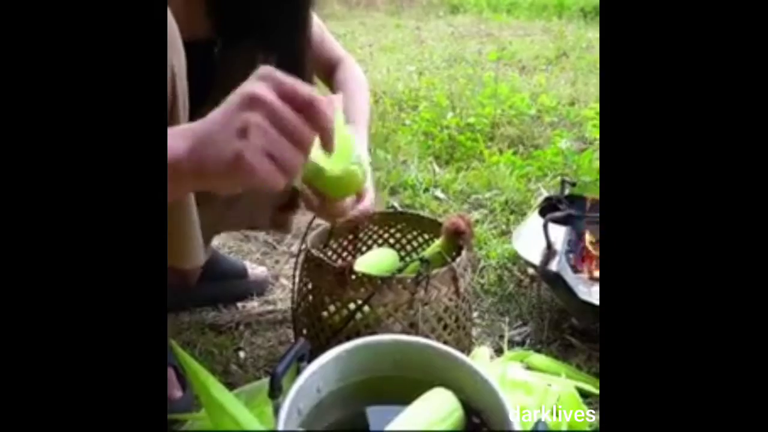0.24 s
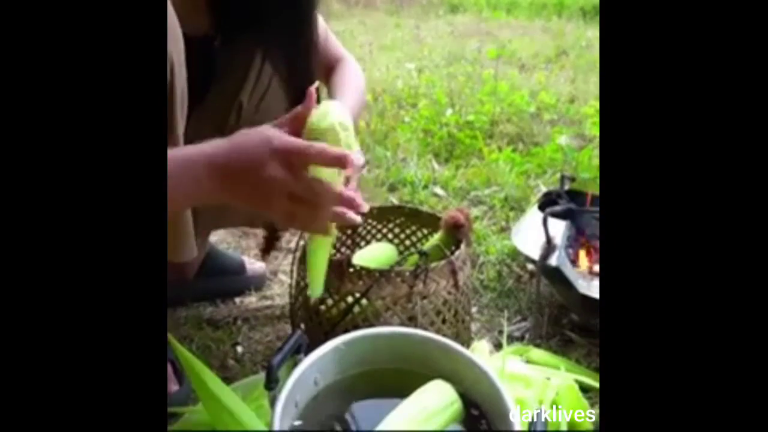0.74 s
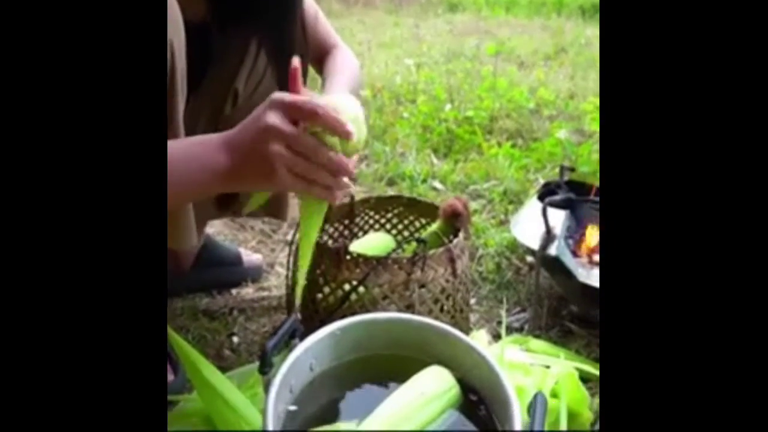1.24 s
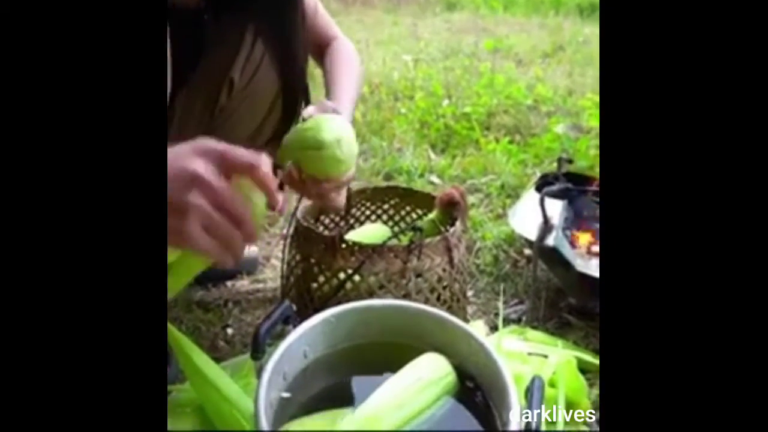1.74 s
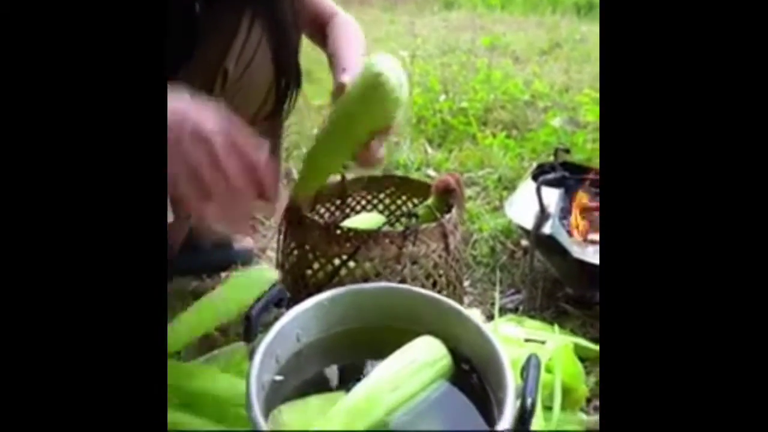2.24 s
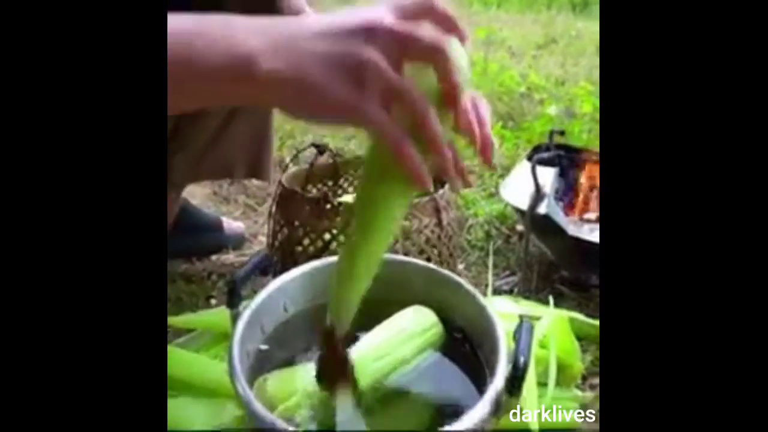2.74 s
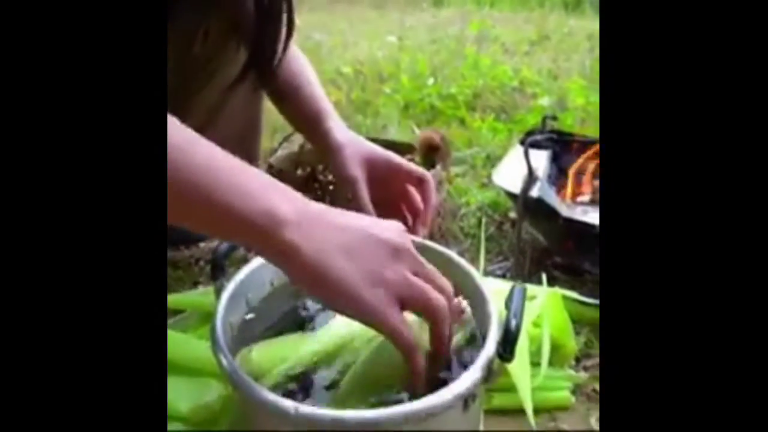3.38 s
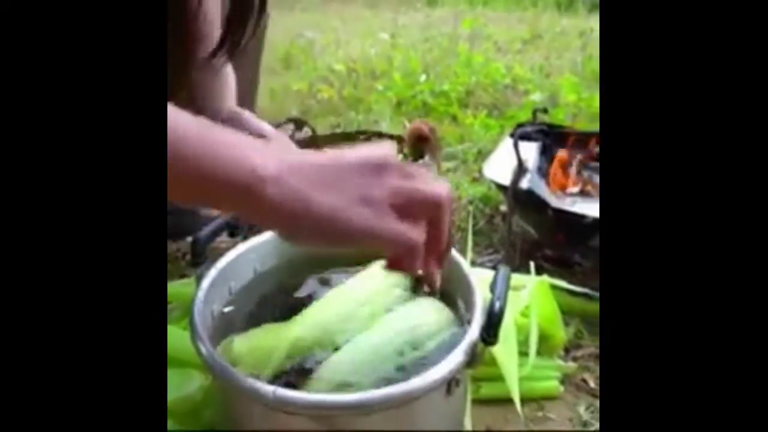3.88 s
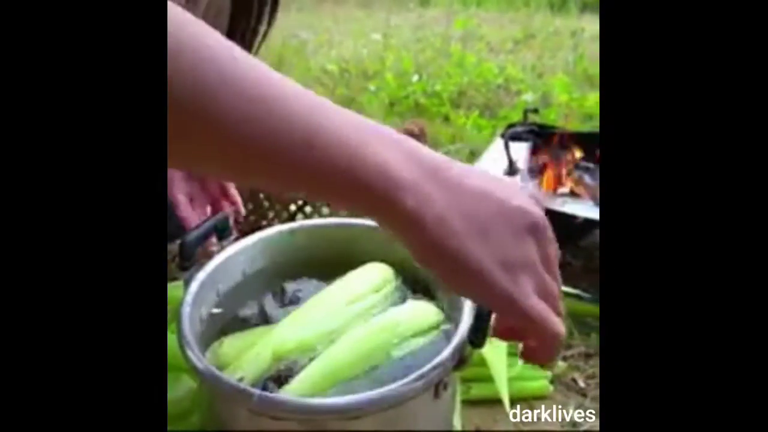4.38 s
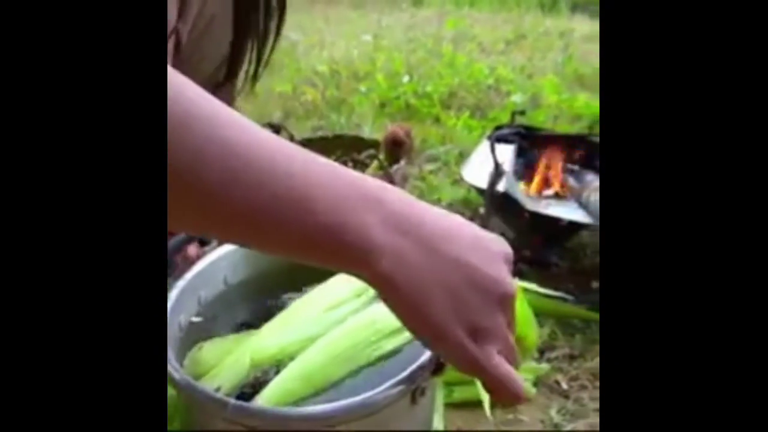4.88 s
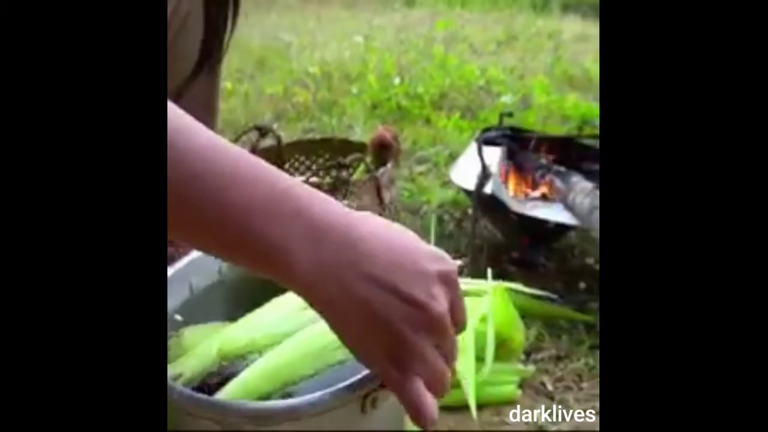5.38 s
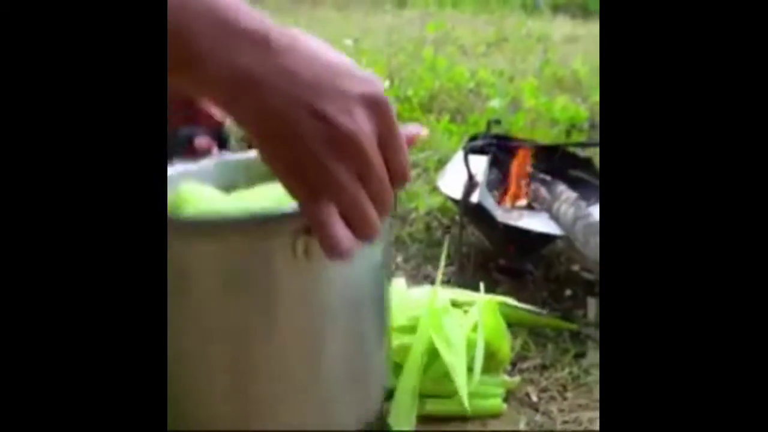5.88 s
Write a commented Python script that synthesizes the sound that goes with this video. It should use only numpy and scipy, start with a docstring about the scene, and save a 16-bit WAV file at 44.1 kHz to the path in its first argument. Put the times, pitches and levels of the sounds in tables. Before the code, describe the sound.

Fresh corn husk rips away with loud crisp cracks, leaves rustle, then a metal pot clicks and briefly rings over a faint low engine throb.

```python
"""A far engine throbs under faint outdoor hiss: dull periodic thuds and coloured noise.
Close by, green husks are ripped from an ear of corn: runs of tiny ringing breaks with loud cracking snaps.
Leaves rustle in strokes of friction noise, soft swells of narrow hiss pass, and soft knocks are dull puffs.
Then the ear goes into a metal pot: it and its handles click and ring through decaying sines,
beside thin bright ticks, likely a small fire."""
import sys
import numpy as np
from scipy import signal
from scipy.fft import rfft, irfft, next_fast_len
from scipy.io import wavfile
from scipy.ndimage import uniform_filter1d

SR = 44100
rng = np.random.default_rng(int(sys.argv[2]) if len(sys.argv) > 2 else 0)


def dump_mix(stems):
    """Bounce the given channels to the path in sys.argv[1] as a 16-bit WAV at rate SR."""
    frames = np.atleast_2d(stems).T  # one column per channel
    limited = np.clip(frames, -1, 1)  # hard clip at full scale
    pcm = np.round(limited * 32767).astype(np.int16)
    wavfile.write(sys.argv[1], SR, pcm)


N = 269715
TIME = np.arange(N) / SR
PADDED = next_fast_len(N, real=True)
HZ = np.fft.rfftfreq(PADDED, 1 / SR)
TAPS = 4096  # samples in the working buffer of a short sound


def amp(db):
    """Turns decibels into a linear gain."""
    return 10 ** (np.asarray(db) / 20)


def unit(x):
    """Scales to rms 1."""
    return x / np.sqrt(np.mean(x ** 2) + 1e-20)


def read(points, hz):
    """Reads a curve joined by straight lines over log frequency."""
    f, value = np.transpose(points)
    return np.interp(np.log(hz + 1), np.log(f + 1), value)


def add(mix, s, sound):
    """Lays a stereo sound into the mix at s seconds."""
    part = mix[:, round(s * SR):][:, :sound.shape[1]]
    part += sound[:, :part.shape[1]]


def shape(x, gain):
    """Filters a whole-length signal by a gain over frequency."""
    return irfft(rfft(x, PADDED) * gain, PADDED)[..., :N]


def tint(x, colour):
    """Gives a whole-length signal a colour, at rms 1."""
    return unit(shape(x, amp(read(colour, HZ))))


def spread(pair, width):
    """Makes left and right from a shared middle and a side part."""
    middle, side = pair[0], width * pair[1]
    return np.array([middle + side, middle - side])


def body(x, colour, hz, tilt_db, peak_db=8, octaves=0.31, ripple_db=5.0):
    """Causal response of a small object: its colour, a tilt, one broad resonance and chance narrow ones."""
    f = abs(np.fft.fftfreq(TAPS, 1 / SR)) + 1
    ripple = ripple_db * np.interp(f, np.linspace(0, SR / 2, num=110), rng.standard_normal(size=110))
    tilt = tilt_db * np.log2(np.maximum(f, 600) / hz)
    resonance = peak_db * np.exp(-(np.log2(f / hz) / octaves) ** 2)
    log_gain = np.log(amp(read(colour, f) + ripple + tilt + resonance))
    # minimum phase, so nothing sounds ahead of the blow
    response = np.fft.ifft(np.exp(np.conj(signal.hilbert(log_gain)))).real[:TAPS // 4]
    return signal.fftconvolve(x, response[None], axes=1)


def grains(per_s, spread_db, smear, sharpness, count=10):
    """Middle and side trains of tiny breaks, each ringing at one of ten pitches, with friction noise between."""
    at = np.flatnonzero(rng.random(N) < per_s / SR)
    strength = amp(spread_db * np.minimum(rng.exponential(1, N)[at], 3.5))
    size = strength * rng.choice([-1., 1.], (2, N))[:, at]
    family = rng.integers(0, count, N)[at]
    out = np.zeros((2, N))
    for k, hz in enumerate(np.geomspace(800, 13000, count)):
        train = np.zeros((2, N))
        train[:, at] = size * (family == k)
        out += signal.lfilter(*signal.iirpeak(hz, sharpness, fs=SR), train)
    return unit(out) + smear * rng.standard_normal((2, N))


# a burst at the reference level has its nominal time scale, halved for every HALVING_DB above it
SNAP_REF_DB, HALVING_DB = -21.5, 12.5


def burst_s(db, reference_s):
    """The harder a break, the sooner it is over."""
    return reference_s * 2 ** ((SNAP_REF_DB - db) / HALVING_DB)


def bursts(rows, colour, crack, width, ripple_db, span_s=0.0053):
    """Each break is one sharp crack at the head of a quickly dying spray of noise."""
    out, t = np.zeros((2, N)), np.arange(TAPS // 4) / SR
    for s, db, time_scale, hz, tilt_db in rows:
        age = t / time_scale
        envelope = (1 - np.exp(-4 * age)) * np.exp(-(age / 2) ** 1.4)
        spray = rng.standard_normal((2, len(t))) * envelope
        spray /= np.linalg.norm(spray[0])
        spray[0, 0] -= crack
        sound = body(spread(spray, width), colour, hz, tilt_db, ripple_db=ripple_db)
        # equal energy at equal level, as if held for span_s
        add(out, s, amp(db) * sound * np.sqrt(span_s * SR / np.sum(sound.mean(0) ** 2)))
    return out


# Colour of the engine. Each row: frequency in Hz, relative gain in dB.
ENGINE_COLOUR = [(15, -15), (30, -14), (45, -4.5), (70, -4), (89, -1), (101, -4.5), (113, -1), (138, -4.5),
                 (170, -15), (230, -21.5), (272, -14.5), (340, -33), (1000, -82)]
RUMBLE_DB = -43.5
THROB_HZ = 13.2  # mean firings of the far engine per second


def rumble(beat_db=-7, wander=0.0125, throb_db=2):
    """A far engine: each firing is a dull thud, blurred by low noise that throbs at the same pace."""
    drift = unit(uniform_filter1d(rng.standard_normal(N), size=SR))
    turns = np.cumsum(THROB_HZ * (1 + wander * drift)) / SR
    firings = np.diff(np.floor(turns), prepend=0)
    thuds = tint(firings - firings.mean(), ENGINE_COLOUR)
    throb = amp(throb_db * np.cos(2 * np.pi * turns))
    blur = tint(rng.standard_normal(N), ENGINE_COLOUR) * throb
    return amp(RUMBLE_DB) * unit(blur + amp(beat_db) * thuds)


# Colour of the outdoor hiss. Each row: frequency in Hz, relative gain in dB.
AIR_COLOUR = [(120, -23), (200, -0.5), (422, -8.5), (446, -7), (585, -6.5), (715, -13.5), (890, -11),
              (1510, -13.5), (2420, -15), (3360, -16.5), (15500, -24)]
AIR_DB = -49.5
# How alike the hiss is at both ears. Each row: frequency in Hz, left-right likeness from 0 to 1.
AIR_LIKENESS = [(100, 0.83), (300, 0.69), (1200, 0.12), (3000, 0.16), (12000, 0.14)]


def outdoors():
    """A low throbbing rumble shared by both ears under a faint wide hiss."""
    same = np.clip(read(AIR_LIKENESS, HZ), 0, 1)
    mid, side = rng.standard_normal((2, N))
    air = spread([mid, shape(side, np.sqrt((1 - same) / (1 + same)))], width=1.0)
    return amp(AIR_DB) * tint(air, AIR_COLOUR) + rumble()


# Strokes of hand and leaf. Each row: middle in seconds, half length in seconds, rub in dB, fizz in dB.
STROKES = [(0.23, 0.11, -44, -47), (0.871, 0.039, -57, -44), (1.041, 0.017, -38, -41),
           (1.138, 0.098, -51.5, -48.5), (1.36, 0.072, -44.5, -44.5), (1.584, 0.15, -45.5, -57),
           (2.04, 0.005, -46, -50), (2.123, 0.14, -47.5, -55.5), (2.315, 0.084, -47, -63),
           (2.519, .08, -43, -48.5), (3.463, 0.029, -52.5, -54), (5.201, 0.039, -66, -43),
           (5.44, 0.077, -46, -45), (6.12, 0.12, -51.5, -52.5)]
# Colour of the dull rub. Each row: frequency in Hz, relative gain in dB.
RUB_COLOUR = [(100, 4), (350, 8.5), (950, 1), (1500, 1.5), (2500, 0), (3800, -14.5), (8000, -10.5),
              (16000, -19)]
# Colour of the fine fizz. Each row: frequency in Hz, relative gain in dB.
FIZZ_COLOUR = [(1000, -19), (3000, 3.5), (5000, -0.5), (9000, -5), (15000, -9)]
STROKE_SHAPE = 1.3  # each stroke swells and fades alike: 1 is pointed, 2 a round bell
HANDLING_RUB_DB = -58  # the faint rustle that goes on between strokes


def rustle():
    """Leaf slides over leaf and skin, catching and slipping in strokes: a dull rub and a finer fizz."""
    middle, half_s, rub_db, fizz_db = np.transpose(STROKES)
    strokes = np.exp(-abs((TIME[:, None] - middle) / half_s) ** STROKE_SHAPE)
    flutter = amp(1.9 * unit(uniform_filter1d(rng.standard_normal(N), size=400)))
    catches = grains(per_s=3000, spread_db=2.5, smear=0.82, sharpness=2.6)
    slips = spread(catches * flutter, width=0.72)
    rub = tint(slips, RUB_COLOUR) * np.hypot(strokes @ amp(rub_db), amp(HANDLING_RUB_DB))
    fizz = tint(slips, FIZZ_COLOUR) * (strokes @ amp(fizz_db))
    return rub + fizz


# Runs of tiny breaks, husk tearing or a handle scraping. Each row: start in seconds, end in seconds,
# level in dB before the mix trim, resonance in Hz, tilt in dB per octave, place of the hardest pull from 0 to 1.
RIP_RUNS = [(0.121, 0.31, -25.5, 2220, 1.3, 0.63), (0.795, 0.879, -35, 1530, -2.5, 0.41),
            (0.93, 0.994, -38.5, 1750, -3, 0.78), (1.05, 1.075, -24.5, 1620, -1.3, 0.42),
            (1.38, 1.435, -37.5, 4700, 2.5, 0.1), (1.669, 1.717, -40.5, 890, 2.9, 0.27),
            (2.124, 2.16, -41.5, 920, -1.5, 0.13), (2.213, 2.306, -44, 2300, -3, 0.37),
            (2.34, 2.365, -43, 1610, 0, .5), (2.508, 2.529, -34.5, 2400, -5, 0.3),
            (4.126, 4.163, -41, 5130, 0, 0.56), (4.8, 4.832, -34.5, 6450, 2, 0.6)]
# Colour of breaking husk, in rips and snaps. Each row: frequency in Hz, relative gain in dB.
HUSK_COLOUR = [(100, -19), (230, 3.5), (340, -13.5), (620, -3), (960, -11.5), (1260, -3.5), (1750, -0.5),
               (2650, -2), (3400, -5), (5500, -7.5), (7100, -11.5), (9100, -12.5), (15000, -20.5)]
SLACK_DB = 25.5  # a run is this much weaker one whole length away from its hardest pull


def rips():
    """Fibres break in a fast, clumpy run that swells and slackens with the pull."""
    out = np.zeros((2, N))
    clumps = amp(2 * unit(uniform_filter1d(rng.standard_normal(N), size=130)))
    breaks = grains(per_s=4900, spread_db=4.5, smear=0.79, sharpness=2.0)
    fibres = spread(breaks * clumps, width=0.21)
    for start, end, db, hz, tilt_db, hardest in RIP_RUNS:
        run = fibres[:, round(start * SR):round(end * SR)]
        length = run.shape[1]
        pull = amp(-SLACK_DB * (np.linspace(0, 1, length) - hardest) ** 2)
        pulled = run * pull * signal.windows.tukey(length, .1)
        sound = body(pulled, HUSK_COLOUR, hz, tilt_db, peak_db=6.0, octaves=0.4)
        add(out, start, amp(db) * sound * np.sqrt(length / np.sum(sound.mean(0) ** 2)))
    return out


# Ribs of the husk snapping. Each row: start in seconds, level in dB before the mix trim, resonance in Hz.
RIB_SNAPS = [(0.132, -24.5, 6570), (0.148, -21.5, 2970), (0.182, -18.5, 4200), (0.1947, -23.5, 1540),
             (0.221, -24.5, 7050), (0.2478, -16, 2780), (0.253, -20.5, 5270), (0.2695, -23.5, 9930),
             (0.281, -18, 9300), (0.3041, -17.5, 3400), (0.3125, -9.5, 2320), (0.39, -39, 1580),
             (0.7987, -31, 2500), (0.8148, -23.5, 1560), (0.831, -30, 1170), (0.9486, -35.5, 1900),
             (0.986, -37.5, 1400), (1.0409, -27, 6000), (1.0428, -20.5, 12500), (1.1546, -31.5, 2040),
             (1.3901, -25.5, 2300), (1.4019, -23, 3200), (1.4182, -21.5, 4900), (1.492, -33.5, 6500),
             (1.5044, -34, 4030), (1.516, -30.5, 5840), (1.5247, -41, 2420), (1.6773, -37.5, 4340),
             (2.185, -31.5, 3200), (2.3267, -31, 1330), (2.509, -32, 2370)]
SNAP_S = 0.0015  # time scale of a snap at the reference level
# dB per octave: thick ribs ring low and dull, thin ones high and bright
THIN_TILT_DB, THICK_TILT_DB, THICK_HZ = 4.05, -5.5, 1400


def snaps():
    """Ribs of the husk break, each as bright as it is thin."""
    rows = []
    for s, db, hz in RIB_SNAPS:
        tilt_db = THIN_TILT_DB + (THICK_TILT_DB - THIN_TILT_DB) * (THICK_HZ / hz) ** 2
        rows.append((s, db, burst_s(db, SNAP_S), hz, tilt_db))
    return bursts(rows, HUSK_COLOUR, crack=0.92, width=0.45, ripple_db=2.5)


# Narrow soft swells of hiss: wet leaf, skin and water, and the pot ringing at 3.06.
# Each row: start in seconds, end in seconds, level in dB, centre in Hz.
HISS_SWELLS = [(0.508, 0.517, -49.5, 2970), (0.534, 0.612, -52, 2500), (2.816, 3.078, -58.5, 2390),
               (3.056, 3.18, -55, 2190), (3.43, 3.485, -52.5, 2120), (3.745, 3.86, -63, 2500),
               (4.339, 4.378, -51, 3900), (5.695, 5.74, -52, 2980)]


def swishes(octaves=.06):
    """Soft swells of hiss around one pitch: wet leaf, skin and water, and once the pot ringing."""
    out = np.zeros((2, N))
    f = np.fft.rfftfreq(SR // 2, 1 / SR) + 1
    for start, end, db, hz in HISS_SWELLS:
        hiss = rfft(spread(rng.standard_normal((2, SR // 2)), width=0.36))
        band = unit(irfft(hiss / (1 + (np.log2(f / hz) / octaves) ** 2) ** 0.48))
        progress = np.arange(band.shape[1]) / SR / (end - start)
        swell = np.sqrt(2) * np.sin(np.pi * np.minimum(progress, 1))
        add(out, start, amp(db) * band * swell)
    return out


# Soft knocks of ear, leaves and pot. Each row: start in seconds, level in dB, decay time constant in seconds,
# centre in Hz.
SOFT_KNOCKS = [(0.815, -55, .016, 290), (1.054, -36.5, 0.01, 730), (1.395, -48.5, .02, 275),
               (2.129, -36, 0.0057, 527), (2.323, -37, 0.005, 384), (3.477, -49.5, .008, 930),
               (6.104, -35, 0.018, 650)]


def knocks(octaves=0.4, rise_s=0.00038):
    """Soft blows: short dull puffs of noise around one pitch, quick to rise and dying exponentially."""
    out, t = np.zeros((2, N)), np.arange(TAPS) / SR
    f = np.fft.rfftfreq(TAPS, 1 / SR) + 1
    for s, db, decay_s, hz in SOFT_KNOCKS:
        band = 1 / (1 + (np.log2(f / hz) / octaves) ** 4)
        puff = irfft(rfft(rng.standard_normal((2, TAPS))) * band)
        puff = spread(puff, width=0.083) * (1 - np.exp(-t / rise_s)) * np.exp(-t / decay_s)
        add(out, s, amp(db) * unit(puff) * np.sqrt(decay_s * SR / TAPS))
    return out


# Pot and handles clicking. Each row: start in seconds, level in dB before the mix trims, resonance in Hz,
# tilt in dB per octave.
POT_CLICKS = [(3.066, -29, 1390, 2), (3.3111, -26.5, 1980, 4.5), (3.3384, -32.5, 3600, 0),
              (4.1524, -18, 2540, 5), (4.1539, -20.5, 2580, -3.5), (4.1692, -36, 3130, 9),
              (4.2168, -41, 3620, -3), (4.4366, -41.5, 2700, 3), (4.451, -36, 3000, 7),
              (4.5992, -36, 1800, -1), (4.646, -35.5, 2450, 4.5), (4.6727, -36.5, 1500, 3),
              (4.69, -41, 5000, -1.5), (4.805, -28.5, 1370, -0.5), (4.8233, -21.5, 7200, 12),
              (5.062, -28.5, 4970, 2), (5.0725, -27, 4850, 2), (5.1511, -32, 4400, 2.5),
              (5.2342, -35, 3730, 2), (6.106, -33, 2140, -2.5)]
# Thin bright ticks, likely the fire. Each row: start in seconds, level in dB before the mix trims.
FIRE_TICKS = [(2.712, -31.5), (4.5251, -44), (4.751, -44), (5.2057, -31)]
# Colour of clicks and ticks. Each row: frequency in Hz, relative gain in dB.
CLICK_COLOUR = [(100, -16), (600, -14), (980, -15), (1500, -7.5), (2070, -4), (2650, 3.5), (3400, -2),
                (5500, -7), (7100, -9), (9100, -18.5), (15000, -29.5)]
CLICK_S, TICK_S = 0.0011, 0.0007  # time scales at the reference level
TICK_HZ, TICK_TILT_DB = 11700, 15  # resonance, and tilt in dB per octave


def clicks_and_ticks():
    """Dry clicks of the pot and its handles, and thinner ticks, likely from the fire."""
    rows = [(s, db, burst_s(db, CLICK_S), hz, tilt_db) for s, db, hz, tilt_db in POT_CLICKS]
    rows += [(s, db, burst_s(db, TICK_S), TICK_HZ, TICK_TILT_DB) for s, db in FIRE_TICKS]
    return bursts(rows, CLICK_COLOUR, crack=0.38, width=0.66, ripple_db=1)


# What the pot and its handles ring with. Each row: frequency in Hz, relative level in dB,
# time to fall by 60 dB in seconds.
POT_MODES = [(2300, -35, 0.29), (2600, 15, 0.079), (2910, 4.5, 0.13), (3120, -9, 0.033), (4020, -10, 0.25),
             (5560, 12, 0.0093), (6000, -43, 0.037)]


def pot_ring(x):
    """The metal rings on briefly after each click or tick: a sum of decaying sines."""
    t = np.arange(SR // 3) / SR
    ring = sum(amp(db - 60 * t / t60) * np.sin(2 * np.pi * hz * t) for hz, db, t60 in POT_MODES)
    return signal.fftconvolve(x, ring[None] / np.linalg.norm(ring), axes=1)[:, :N]


def echo(x, delay_s=.0026, echo_db=-10):
    """One slightly dulled reflection from the ground just below the hands."""
    out = np.zeros((2, N))
    add(out, delay_s, amp(echo_db) * uniform_filter1d(x, size=3, axis=1))
    return out


def surroundings(x, low_t60=.095, high_t60=.075, split_hz=4000, high_db=-4):
    """A short scatter from ground, basket and pot, different at each ear: two bands of decaying noise."""
    t = np.arange(SR // 4) / SR
    taps = spread(rng.standard_normal((2, len(t))), width=0.63) * (t > .002)
    low = signal.sosfilt(signal.butter(2, split_hz, fs=SR, output="sos"), taps)
    high = signal.sosfilt(signal.butter(2, split_hz, "high", fs=SR, output="sos"), taps)
    tail = low * amp(-60 * t / low_t60) - high * amp(high_db - 60 * t / high_t60)
    return signal.fftconvolve(x, tail / np.linalg.norm(tail[0]), axes=1)[:, :N]


# How much the two microphones differ on near sounds. Each row: frequency in Hz,
# gain on the side signal in dB before the overall width.
MIC_SPACING = [(300, -11.5), (1200, -7), (2200, -3.5), (4500, 6), (12000, 4)]


def scene():
    """Husk in front, pot and fire a little to the right, all close to the ground."""
    husk = amp(-1.5) * rips() + amp(-3.0) * snaps()
    clicks = amp(-1.5) * clicks_and_ticks() * amp([[-.7], [.7]])  # left and right trims in dB
    ring = amp(-21) * pot_ring(clicks)
    hits = husk + clicks + ring + knocks()
    near = hits + rustle() + swishes()
    left, right = near + echo(near) + amp(-10.5) * surroundings(hits)
    side = shape((left - right) / 2, amp(read(MIC_SPACING, HZ)))
    return spread([(left + right) / 2, side], width=0.74) + outdoors()


EDGE_HZ = 15900  # top of the recorder's band


def record(dry):
    """The recorder rounds off the tallest peaks, then limits the band."""
    rounded = np.tanh(dry)
    lowpass = signal.firwin(401, EDGE_HZ, window=("kaiser", 9), fs=SR)
    return signal.oaconvolve(rounded, lowpass[None], "same")


dry = scene()
out = record(dry)
dump_mix(out)
```